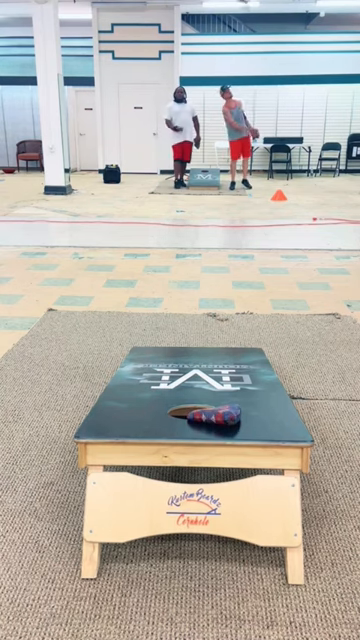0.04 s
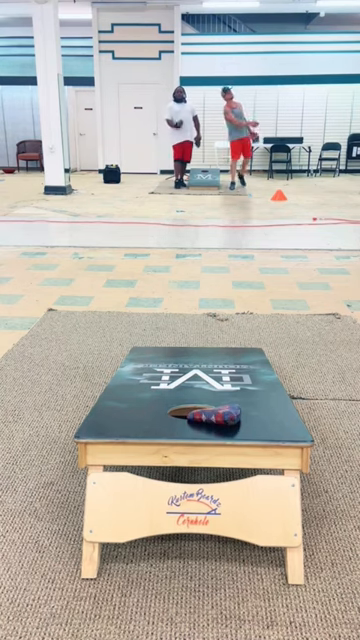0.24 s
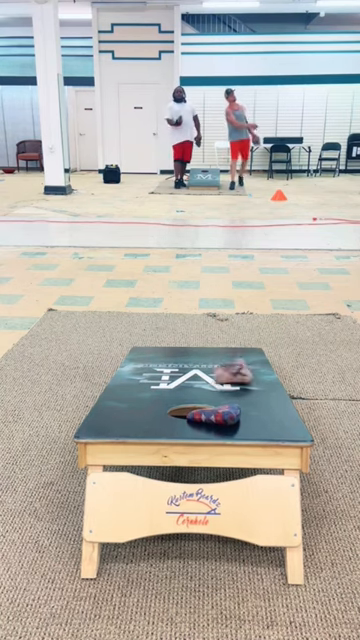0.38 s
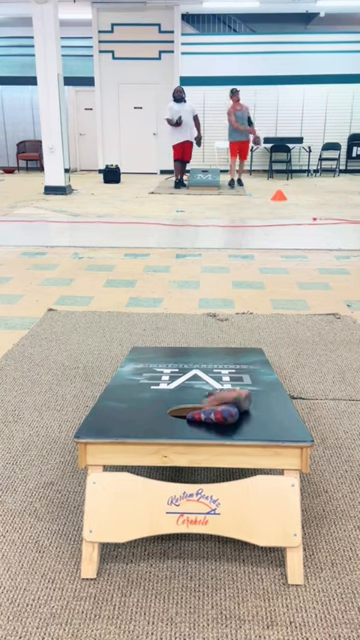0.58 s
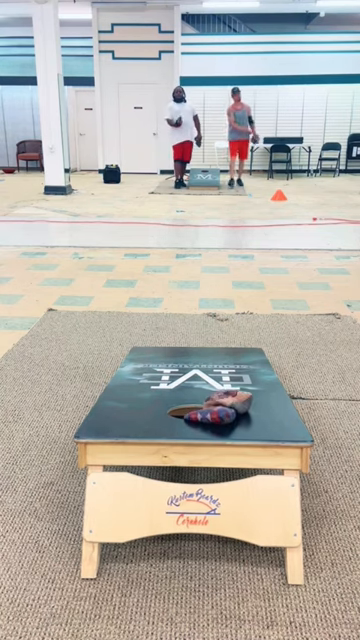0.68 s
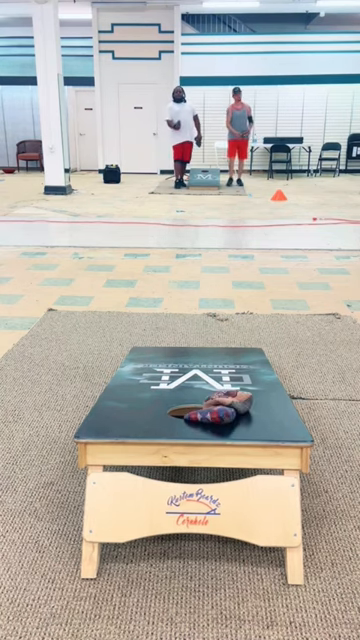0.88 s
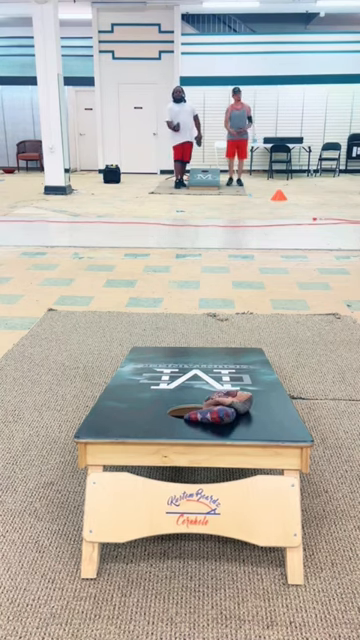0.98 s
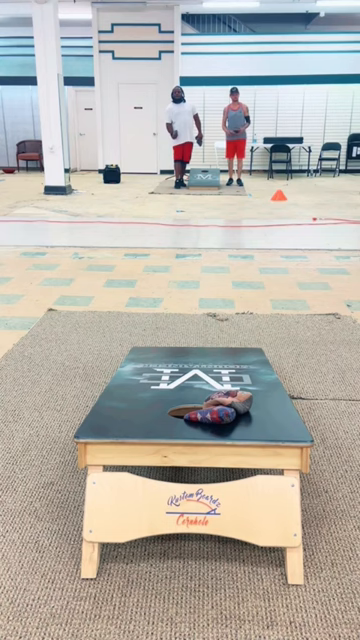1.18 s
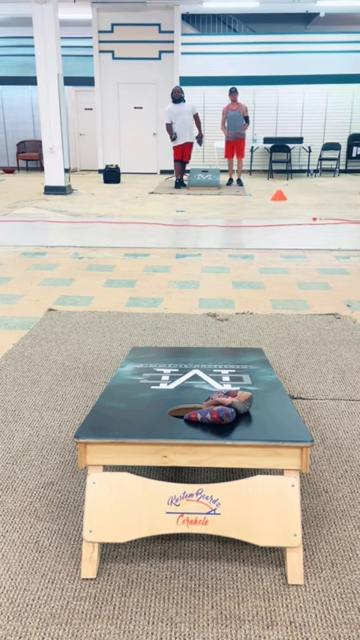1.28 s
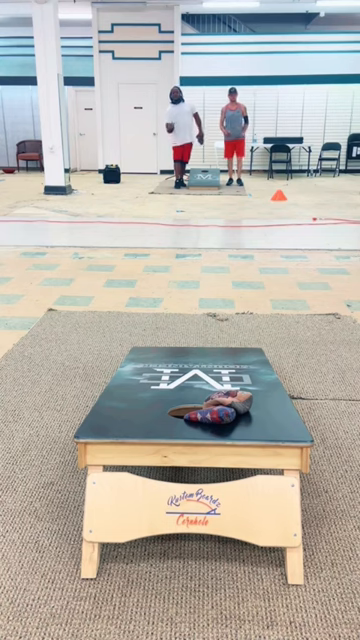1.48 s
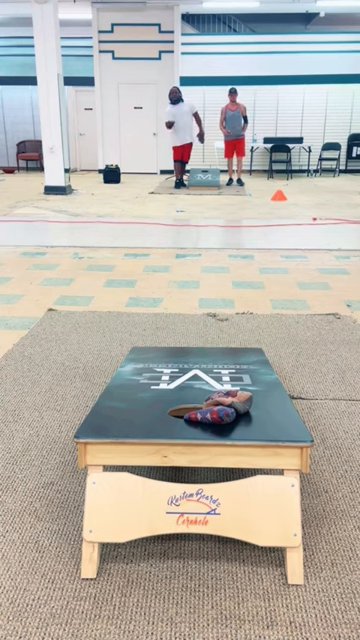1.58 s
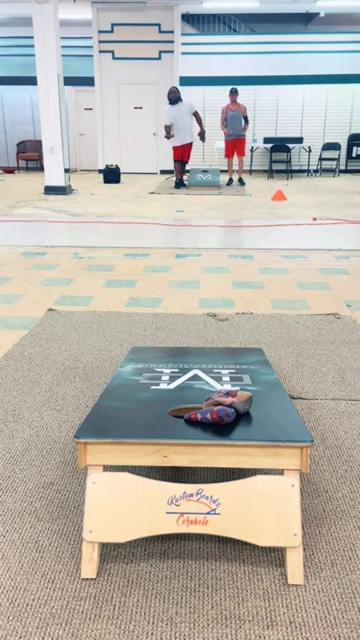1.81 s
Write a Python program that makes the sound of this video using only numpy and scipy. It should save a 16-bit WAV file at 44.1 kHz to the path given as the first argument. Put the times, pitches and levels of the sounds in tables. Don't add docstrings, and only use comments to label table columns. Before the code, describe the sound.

A beanbag smacks a hollow wooden board close to the microphone, its pellets crunching briefly, then far walls slap back and a long, dull echo fades through a large, hard indoor hall over faint ventilation rumble.

```python
import sys
import numpy as np
from scipy import signal
from scipy.fft import rfft, irfft
from scipy.io import wavfile

SR = 44100
rng = np.random.default_rng(int(sys.argv[2]) if len(sys.argv) > 2 else 0)


def ratio(d):
    e = np.asarray(d, float) / 20
    return 10 ** e


def store_wav(level_fs):
    pcm = np.round(np.clip(np.atleast_2d(level_fs), -1, 1) * 32767)
    wavfile.write(sys.argv[1], SR, pcm.T.astype(np.int16))


N = 81585
LAND_S = .2153
BOARD_DB = 2
GRAINS_PER_S, GRAIN_SPREAD_DB = 22000, 1.5
TOUCH_TOP_HZ = 6000
BUILD_S, EARLY_DB, EARLY_S = 0.16, 1, 0.0078
SPREAD_DB, RING_DB, RING_TOP_HZ = 12, -10.5, 380
TICK_S, TICK_DB = .1875, -42
AIR_DB = -61
BASS_CUT_HZ, EDGE_HZ = 12, 9900

# pitch_hz, peak_db, rise_s, t60_s
BOARD_MODES = [(68, -31, .038, .12), (143, -15, .015, .07), (225, -13, .017, .11), (334, -17, .011, .05),
               (305, -9.5, .022, .1), (436, -12, .012, .04), (602, -15, .008, .045), (762, -22, .009, .1),
               (1014, -25, .011, .05), (1195, -31, .005, .05), (1535, -26, .006, .025),
               (1780, -29, .004, .035), (2397, -27, .006, .025), (3190, -23, .005, .022)]
# time_s, level_db
CRUNCH_EFFORT = [
    (.204, -72),
    (.2095, -44.5),
    (.2145, -38.5),
    (.2165, -20),
    (.223, -25),
    (.229, -35),
    (.25, -41),
    (.27, -53),
    (0.329, -87.5),
]
# pitch_hz, level_db
CRUNCH_COLOUR = [(400, -0.5), (1000, -1.5), (2600, -3), (4500, -12), (6200, -8.5), (7900, -6.5),
                 (9000, -9.5), (9900, -27.5)]
# delay_s, level_db
WALL_ECHOES = [(.066, -16), (0.111, -23), (.172, -18.5), (0.26, -20.5), (.73, -27.5)]
# delay_s, level_db over the swell, spread_s
WALL_SLAPS = [(0.033, 4, 0.0075), (.075, -1.5, 0.0033), (0.122, -0.5, 0.012), (0.176, 2, 0.0033),
              (0.269, 0.5, 0.023)]
# pitch_hz, t60_s
HALL_DECAY = [(60, 2.7), (160, 2.02), (420, 2.47), (1100, 2.48), (2900, 1.926), (5000, 1.63), (7000, 1.32),
              (9500, 1.425)]
# pitch_hz, level_db per Hz
BLOW_COLOUR = [(45, -25.5), (120, -11), (320, 0.5), (560, -8), (1100, -23), (3600, -33), (6000, -35.5),
               (9200, -44), (9500, -69.5)]
# pitch_hz, width_hz, level_db
HALL_HUMPS = [(209, 22, 6), (328.7, 11, 6.5), (500, 110, -2), (850, 330, 1), (2170, 150, 4),
              (3400, 370, 5.5), (6500, 2000, 3)]
# pitch_hz, level_db, t60_s, rise_s
STANDING_WAVES = [(143.3, -26.5, 2.95, .1), (130.15, -40, 0.94, .1), (150, -31.5, 1.8, 0.088)]
# centre_s, level_db, rise_s, fall_s
CLOTH_RUSTLES = [
    (0.186, -73.5, 0.023, 0.019),
    (1.49, -82, 0.064, .06),
    (1.664, -85.5, 0.016, 0.018),
    (1.76, -83, 0.018, .035),
]
# pitch_hz, level_db
CLOTH_COLOUR = [(1500, -9), (3500, -3.5), (5000, -13), (7500, -2), (9200, -7), (9600, -28.5)]
# pitch_hz, level_db
AIR_COLOUR = [(20, -39.5), (59, 6), (244, -6), (1000, -23.5), (1500, -24.5), (2980, -38.5), (3900, -36),
              (5200, -46), (9200, -48), (9700, -71)]


def read(points, hz):
    f, value = np.transpose(points)
    return np.interp(np.log(hz + 1), np.log(f + 1), value)


def evened(x):
    return x / np.sqrt(np.mean(x ** 2) + 1e-20)


def colour(x, tone):
    gain = ratio(read(tone, np.fft.rfftfreq(len(x), 1 / SR)))
    return irfft(rfft(x) * gain, len(x))


def low_pass(x, order, top_hz):
    return signal.lfilter(*signal.butter(order, top_hz, fs=SR), x)


def add(mix, s, sound):
    mix[round(s * SR):][:len(sound)] += sound


def grains(per_s, spread_db):
    hit = rng.random(N) < per_s / SR
    size_db = spread_db * np.minimum(rng.exponential(1, N), 4)
    return evened(hit * ratio(size_db) * rng.standard_normal(N))


def board():
    t = np.maximum(np.arange(N) / SR - LAND_S, 0)
    ring = np.zeros(N)
    for k, (hz, db, rise, t60) in enumerate(BOARD_MODES):
        direction = (-1) ** (k // 3)
        swell = np.sin(np.pi / 2 * np.minimum(t / rise, 1)) ** 2
        decay = ratio(db - 60 * np.maximum(t - rise, 0) / t60)
        ring += direction * swell * decay * np.sin(2 * np.pi * hz * t)
    return ratio(BOARD_DB) * ring


def filling():
    t = np.arange(N) / SR
    s, db = np.transpose(CRUNCH_EFFORT)
    effort = ratio(np.interp(t, s, db, left=-140, right=-140))
    crunch = evened(colour(grains(GRAINS_PER_S, GRAIN_SPREAD_DB), CRUNCH_COLOUR))
    dull = low_pass(crunch, 4, TOUCH_TOP_HZ)
    pressed = np.clip((t - LAND_S) / .003 + 1, 0, 1)
    return effort * (dull + pressed * (crunch - dull))


def echoes(ring):
    low = low_pass(ring, 2, 500)
    return sum(ratio(db) * np.roll(low, round(s * SR)) for s, db in WALL_ECHOES)


def hall_tail():
    taps = np.zeros(N)
    at = np.arange(0, N - 20, 20)
    taps[at + rng.integers(0, 20, len(at))] = rng.choice([-1., 1.], len(at))
    hz, t, bands = signal.stft(taps, SR, nperseg=512)
    bands = bands * ratio(-60 * t / read(HALL_DECAY, hz)[:, None])
    dying = signal.istft(bands, SR, nperseg=512)[1][:N]
    t = np.arange(N) / SR
    early = ratio(EARLY_DB) * (1 - np.exp(-(t / EARLY_S) ** 2))
    late = 1 - np.exp(-(t / BUILD_S) ** 2)
    bunch_db = sum(db * np.exp(-.5 * ((t - s) / w) ** 2) for s, db, w in WALL_SLAPS)
    tail = dying * (early + late) * ratio(bunch_db)
    return tail / np.linalg.norm(tail)


def blow():
    hz = np.fft.rfftfreq(4096, 1 / SR)
    humps_db = sum(db * np.exp(-.5 * ((hz - f) / w) ** 2) for f, w, db in HALL_HUMPS)
    log_gain = np.log(ratio(read(BLOW_COLOUR, hz) + humps_db))
    both_sides = np.concatenate([log_gain, log_gain[-2:0:-1]])
    pulse = np.fft.ifft(np.exp(np.conj(signal.hilbert(both_sides)))).real
    return pulse / np.linalg.norm(pulse)


def hall(ring):
    source = ratio(RING_DB) * low_pass(ring, 2, RING_TOP_HZ)
    add(source, LAND_S + .009, ratio(SPREAD_DB) * blow())
    return signal.fftconvolve(source, hall_tail())[:N]


def hall_tones():
    t = np.maximum(np.arange(N) / SR - LAND_S, 0)
    tones = np.zeros(N)
    for hz, db, t60, rise in STANDING_WAVES:
        swell = 1 - np.exp(-(t / rise) ** 2)
        tones += ratio(db - 60 * t / t60) * swell * np.sin(2 * np.pi * hz * t)
    return tones


def rustles():
    t = np.arange(N) / SR
    level = np.zeros(N)
    for s, db, rise, fall in CLOTH_RUSTLES:
        level += ratio(db) * np.exp(-.5 * ((t - s) / np.where(t < s, rise, fall)) ** 2)
    return level * evened(colour(grains(12000, 2.0), CLOTH_COLOUR))


def tick():
    click = ratio(TICK_DB) * (np.arange(N) == round(TICK_S * SR))
    return colour(click, [(2000, -18.5), (4000, -2), (9000, -2), (9600, -30)])


def air():
    return ratio(AIR_DB) * evened(colour(rng.standard_normal(N), AIR_COLOUR))


def scene():
    ring = board()
    hit = ring + filling()
    room = echoes(ring) + hall(ring) + hall_tones()
    background = rustles() + tick() + air()
    return (hit + room + background)[None]


def roll_off(x):
    return signal.sosfilt(signal.butter(12, 10260, fs=SR, output="sos"), x)


def record(dry):
    dry = signal.lfilter(*signal.butter(2, BASS_CUT_HZ, "high", fs=SR), dry)
    edge = signal.firwin(255, EDGE_HZ, window=("kaiser", 9), fs=SR)
    return roll_off(signal.oaconvolve(dry, edge[None], "same"))


dry = scene()
out = record(dry)
store_wav(out)
```